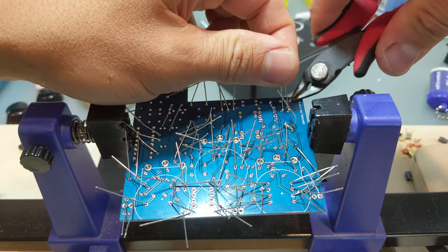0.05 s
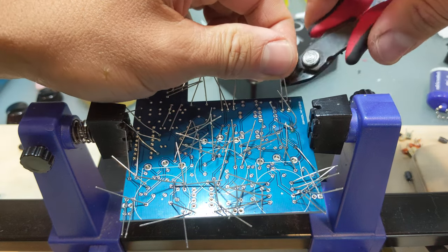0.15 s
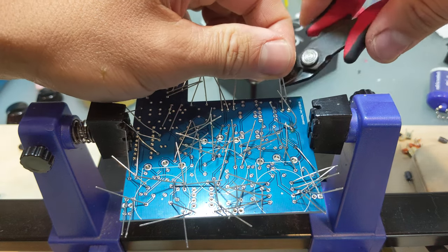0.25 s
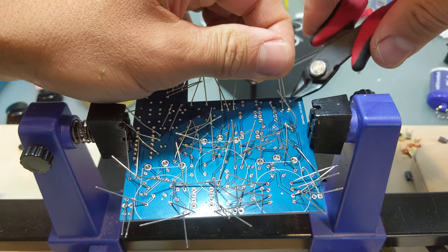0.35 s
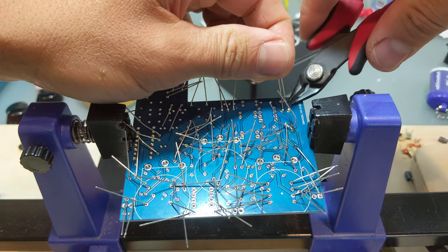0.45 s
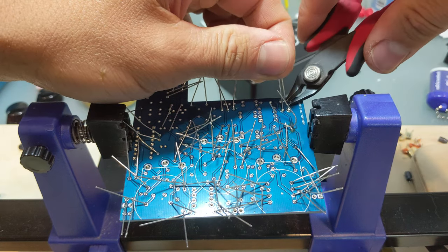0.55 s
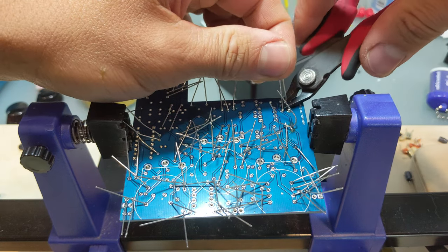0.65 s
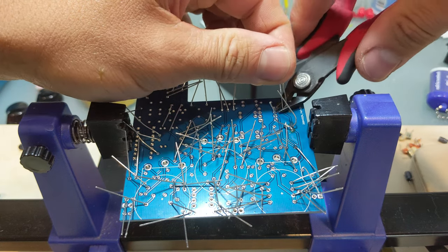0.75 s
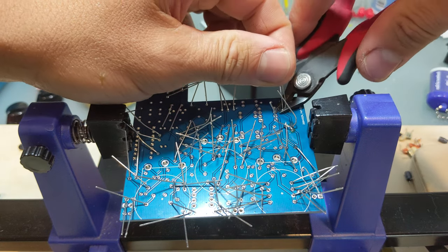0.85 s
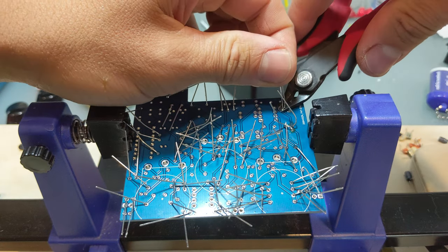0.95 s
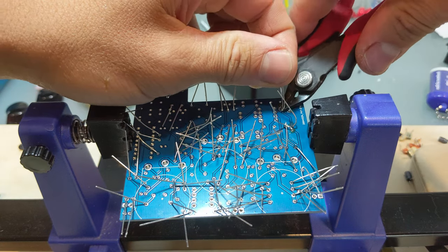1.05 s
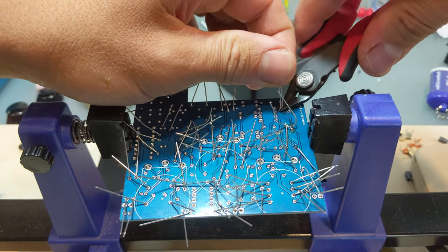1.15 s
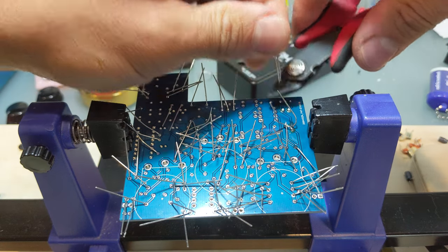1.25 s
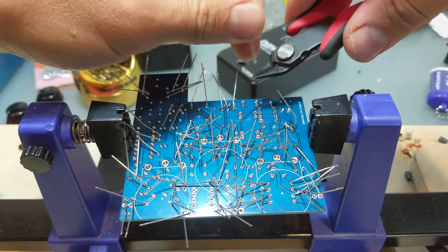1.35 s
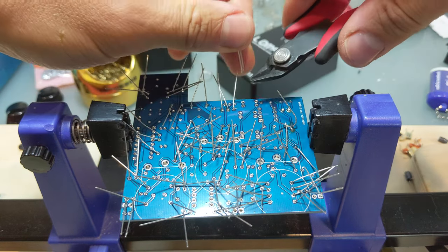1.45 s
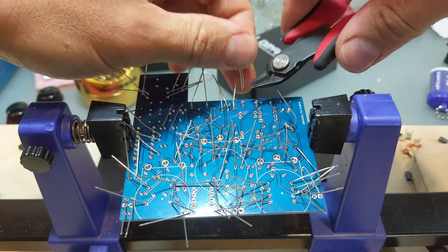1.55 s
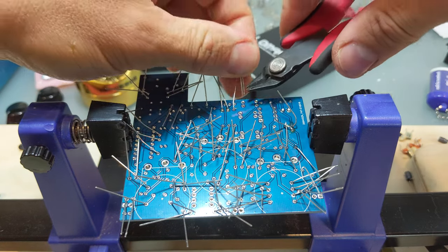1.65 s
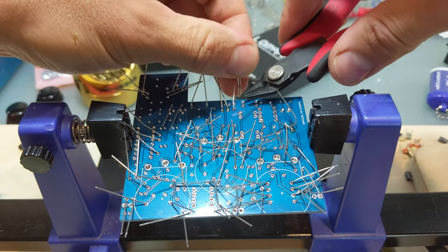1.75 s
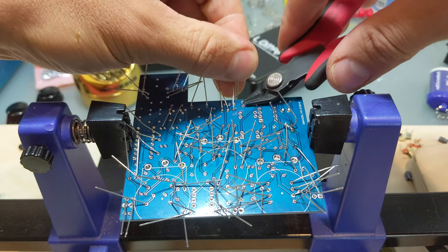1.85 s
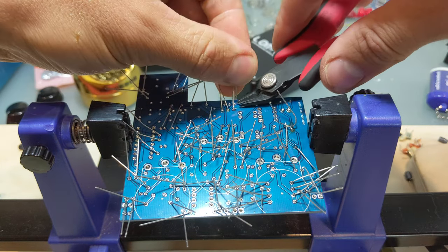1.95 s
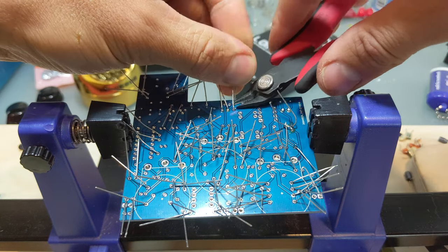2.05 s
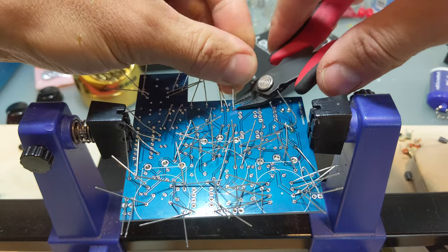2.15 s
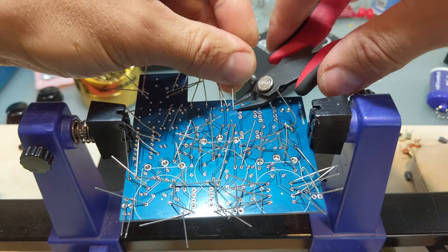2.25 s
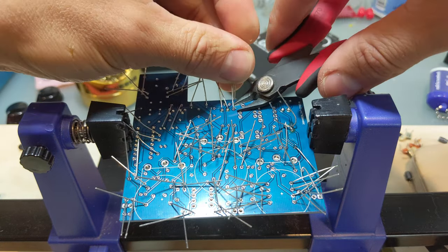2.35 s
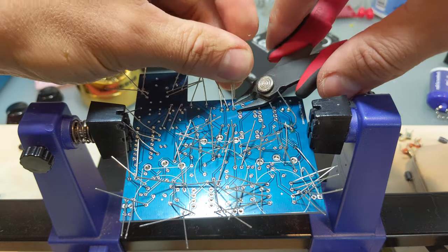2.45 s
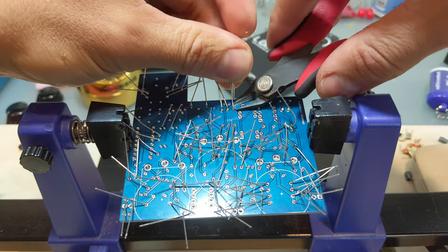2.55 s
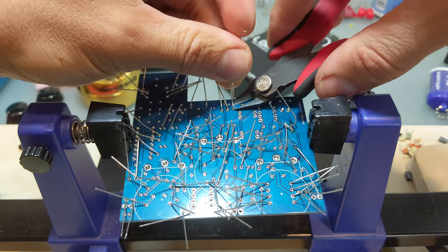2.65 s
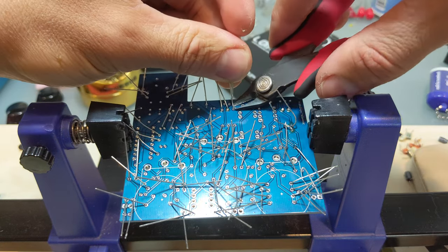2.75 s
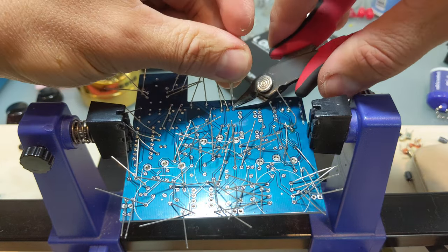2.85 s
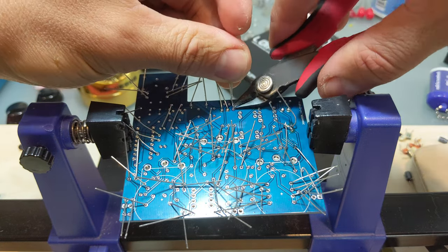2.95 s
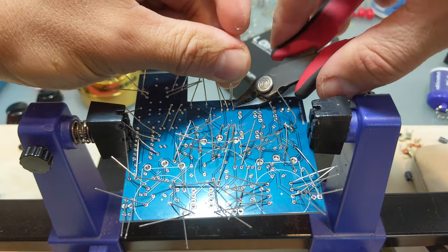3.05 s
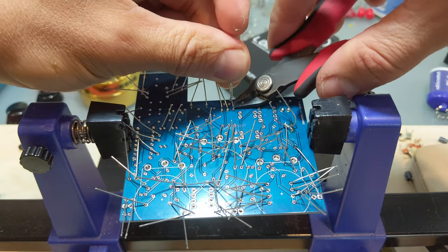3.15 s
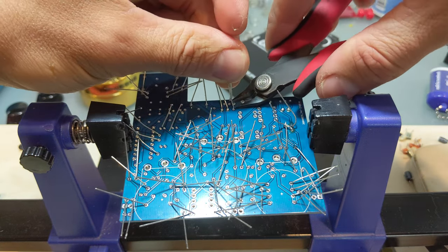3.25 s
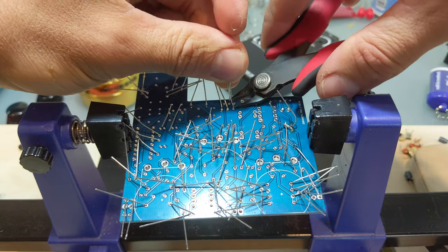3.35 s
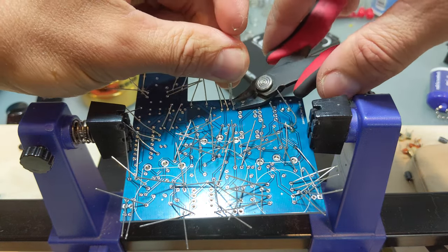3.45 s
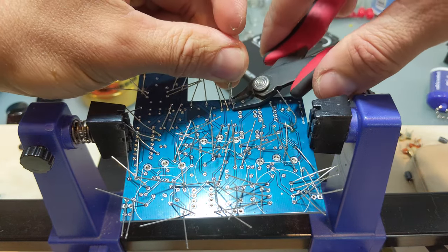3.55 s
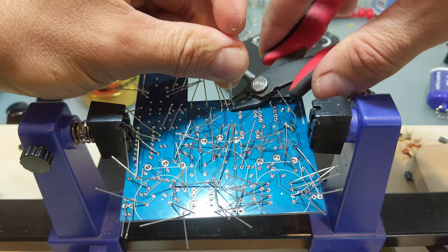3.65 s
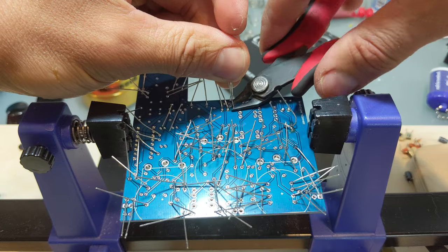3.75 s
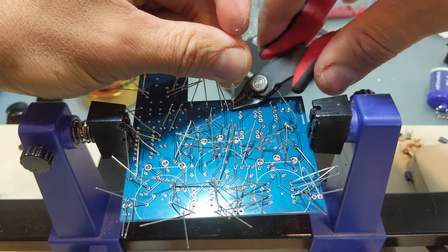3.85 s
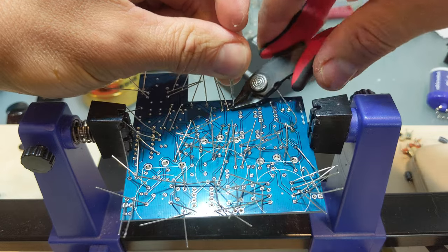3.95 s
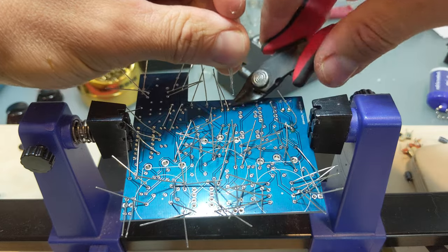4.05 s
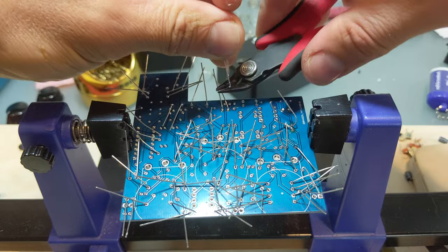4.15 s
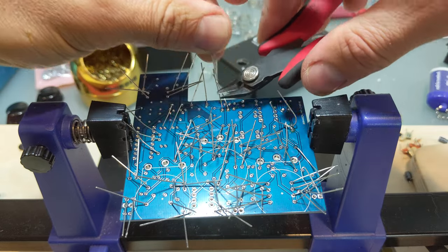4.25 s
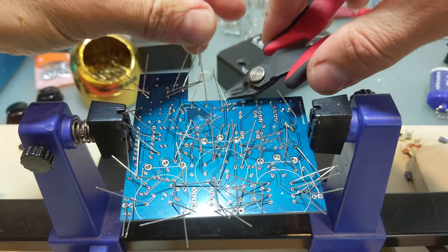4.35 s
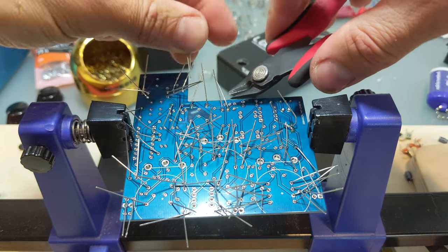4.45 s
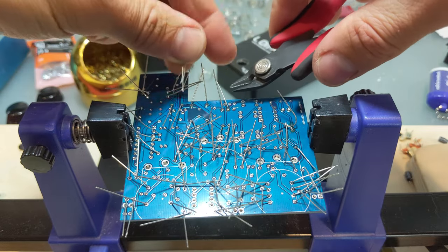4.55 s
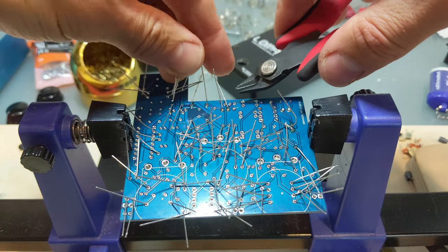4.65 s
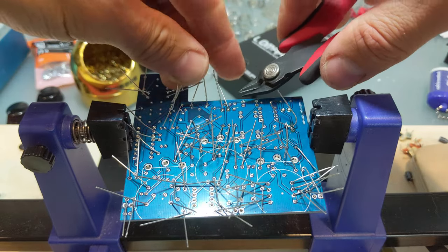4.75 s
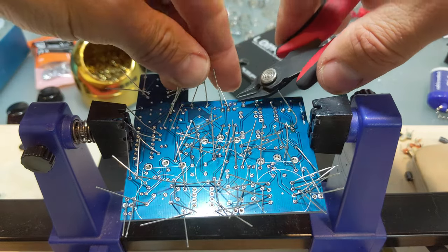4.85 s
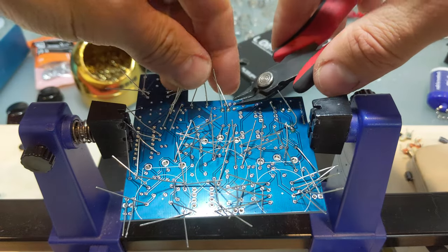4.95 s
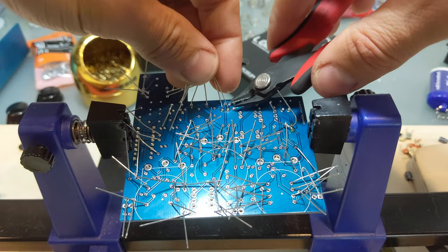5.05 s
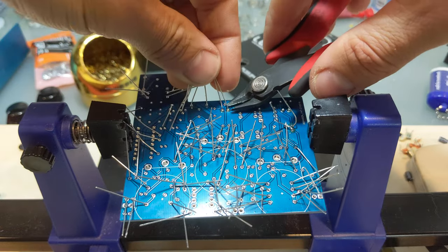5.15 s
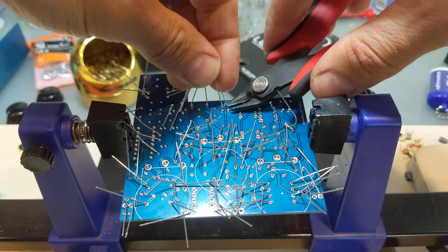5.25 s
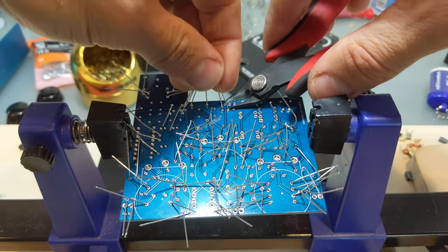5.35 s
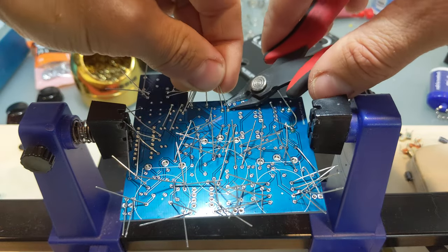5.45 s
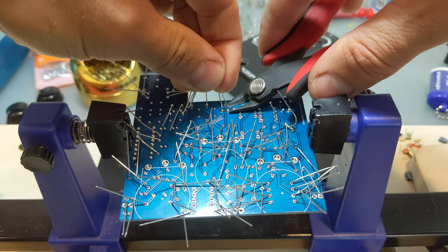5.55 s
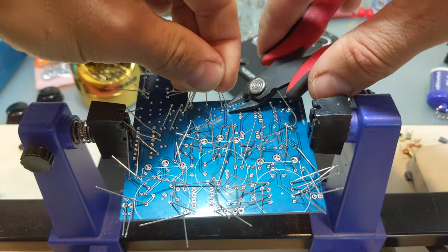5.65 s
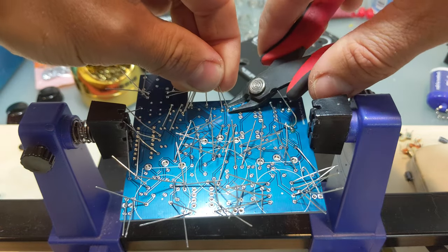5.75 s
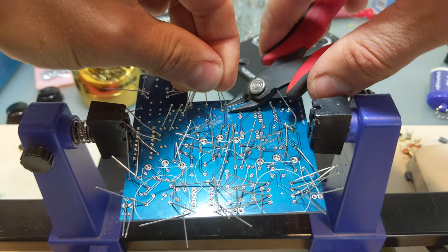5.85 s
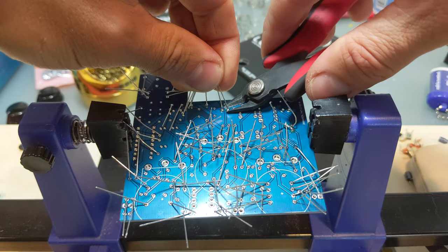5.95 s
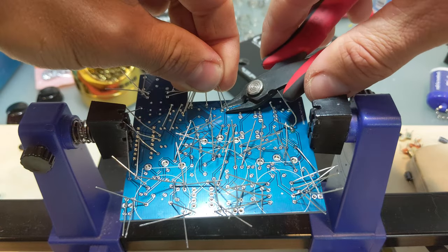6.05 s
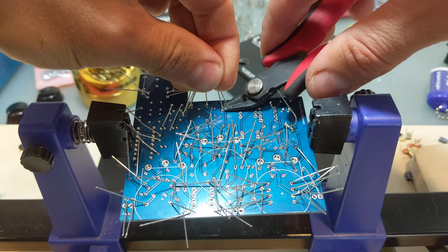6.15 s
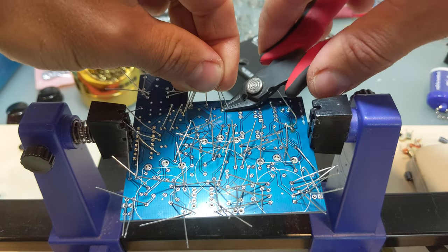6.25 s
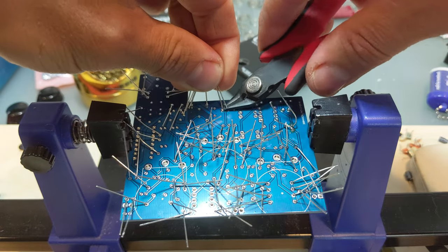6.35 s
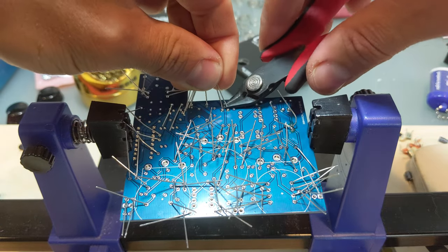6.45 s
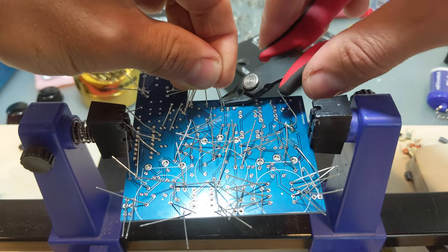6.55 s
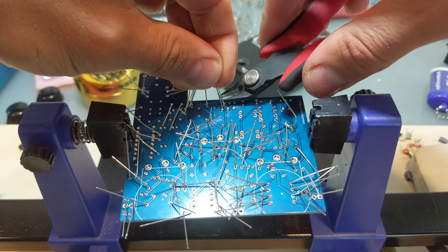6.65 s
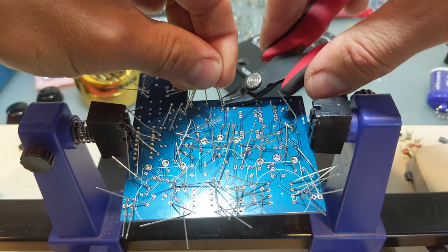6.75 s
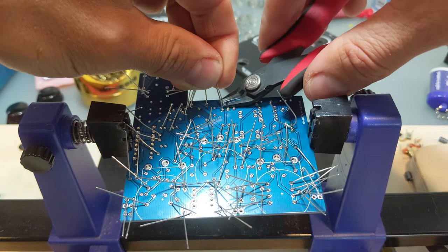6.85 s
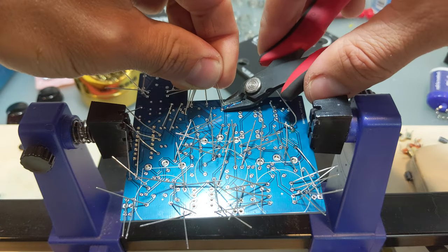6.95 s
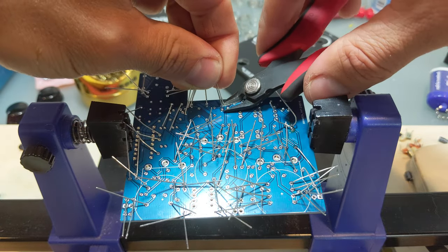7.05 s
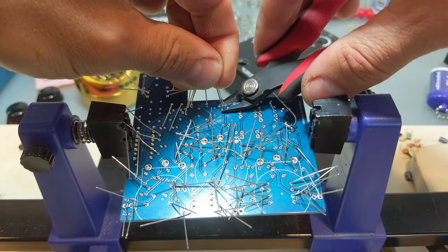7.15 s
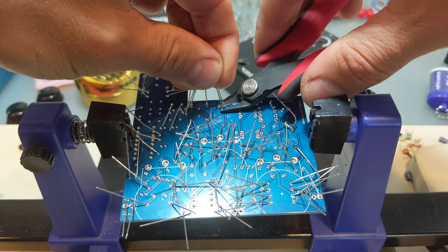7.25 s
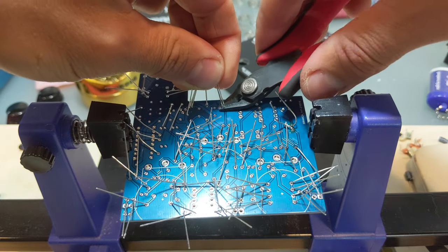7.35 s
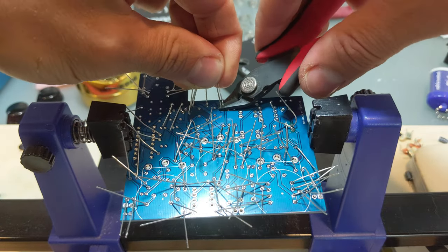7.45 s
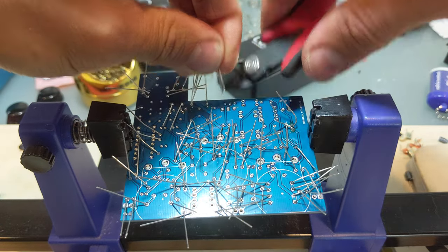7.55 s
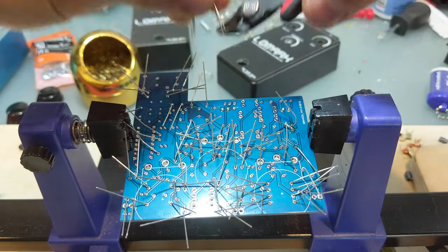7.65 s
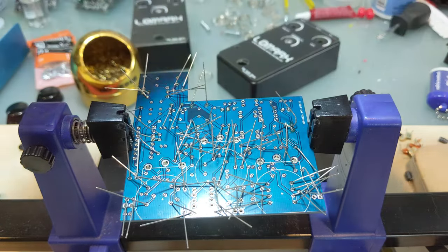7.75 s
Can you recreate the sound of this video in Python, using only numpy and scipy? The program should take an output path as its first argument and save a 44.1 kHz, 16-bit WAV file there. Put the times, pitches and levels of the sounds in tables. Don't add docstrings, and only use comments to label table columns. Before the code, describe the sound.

Close stereo sound of a workbench, the action stronger and brighter on the right. At 0.0 s the loudest snip cracks, a dry metallic snap with a short board ring, followed at once by jaw taps and a scrape; another tap comes at 0.5 s. A second snip falls at 1.2 s, then faint touches and wire ticks. At 4.0 s a third cut carries a solid woody knock from the holder. Around 5.0 to 5.1 s taut leads ping thinly amid light drags and ticks. A sharp, bright snip comes at 6.4 s, then small nudges around 6.6 s. Taps and scraping at 7.4 s lead into a duller, ringing cut at 7.5 s, and at 7.6 s a cut lead clinks brightly into a metal cup. Throughout, a low motor hum swells and wavers faintly beneath soft air noise, hiss and delicate wire rustling.

```python
import sys
import numpy as np
from scipy import signal
from scipy.fft import rfft, irfft
from scipy.io import wavfile

SR = 44100
rng = np.random.default_rng(int(sys.argv[2]) if len(sys.argv) > 2 else 0)


def store_pcm(level_fs):
    pcm = np.round(np.clip(level_fs, -1, 1) * 32767).astype(np.int16)
    wavfile.write(sys.argv[1], SR, np.atleast_2d(pcm).T)


def nominal_scale(level):
    x = np.asarray(level, float) / 20
    return 10 ** x


N = 343539
BITE_S = 0.003


def rms_one(x):
    return x / np.sqrt(np.mean(x ** 2) + 1e-20)


def at_hz(points, hz):
    point_hz, value = np.array(points).T
    return np.interp(np.log(hz), np.log(point_hz), value)


def in_time(rows):
    s, level_db = np.transpose(rows)
    return np.interp(np.arange(N) / SR, s, level_db)


def drift(rate):
    r = np.exp(-80 * np.pi * rate / SR)
    slow = signal.lfilter([1], [1, -2 * r, r * r], rng.standard_normal(N // 40 + 2002))[2000:]
    return np.interp(np.arange(N) / 40, np.arange(len(slow)), rms_one(slow))


def narrow(x, hz, width_hz):
    r = np.exp(-np.pi * width_hz / SR)
    top_gain = (1 - r * r) / 2
    return signal.lfilter(np.array([1, 0, -1]) * top_gain, [1, -2 * r * np.cos(2 * np.pi * hz / SR), r * r], x)


def air():
    # pitch_hz [Hz], level_db [dB per Hz]
    colour = [(15, -45), (25, -3), (66, -3.5), (186, -8), (237, -15.5), (286, -11.5), (404, -16.5),
              (488, -15.5), (1030, -20), (3010, -23.5), (3540, -24.5), (8100, -32), (12400, -35),
              (13800, -38), (15000, -16.5)]
    # pitch_hz [Hz], likeness [0 to 1]
    likeness = [(60, 0.77), (180, 0.84), (550, 0.24), (1650, 0.01), (4970, 0.063), (15000, 0.0123)]
    # pitch_hz [Hz], left_minus_right_db [dB]
    balance = [(60, -9), (180, -0.5), (550, -1.5), (1650, -2.0), (4970, -2.5), (15000, -1.5)]
    hz = np.maximum(np.fft.rfftfreq(N, 1 / SR), 10)
    mid, side = rfft(rng.standard_normal((2, N)))
    alike = np.clip(at_hz(likeness, hz), 0, 1)
    lean = nominal_scale(at_hz(balance, hz) / 2)
    pair = np.sqrt(1 + alike) * mid + np.sqrt(1 - alike) * side * [[1], [-1]]
    pair = np.array([lean, 1 / lean]) * pair
    return nominal_scale(-55.5) * rms_one(irfft(pair * nominal_scale(at_hz(colour, hz)), N))


def hum():
    # start_s [s], level_db [dB]
    swells = [(0.0, -57), (0.91, -52), (1.82, -66), (1.97, -51), (2.1, -75), (2.17, -56), (2.62, -66.5),
              (2.73, -53), (2.8, -60.5), (3.75, -49.5), (5.21, -57), (5.68, -69), (6.33, -53.5),
              (6.94, -56.5), (6.99, -68), (7.35, -55), (7.59, -70), (7.79, -60)]
    turn = 2 * np.pi * np.cumsum(59.1 + 0.3 * drift(2.08)) / SR
    base = np.sin(turn + 0.5 * drift(3.1)) * nominal_scale(in_time(swells) + 3.0 + 0.5 * drift(10.0))
    second = nominal_scale(-9.5) * np.sin(2 * turn) * nominal_scale(drift(3.5))
    fourth = np.sin(4 * turn)
    overtone = nominal_scale(-14.5) * np.sin(8.3 * turn) * nominal_scale(2.0 * drift(1.5))
    upper = (fourth + second + overtone) * nominal_scale(-61.5 + 2.55 * drift(8.6))
    return (base + upper) * nominal_scale([[-2.4], [2.1]])


def rustle():
    # start_s [s], level_db [dB]
    handling = [
        (0, -74.5),
        (1.9, -72),
        (4.55, -73.5),
        (4.7, -77),
        (6.0, -81),
        (6.9, -79),
        (7.79, -75),
    ]
    sizes = nominal_scale(3.6 * np.minimum(rng.exponential(1, N), 3.5)) * rng.choice([-1, 1], N)
    ticks_per_s = 250 * nominal_scale(4 * drift(8.0))
    stir = sizes * (rng.random(N) < ticks_per_s / SR)
    grain = rms_one(narrow(narrow(stir, 3700, 910), 2400, 1800)) * nominal_scale(-75.5)
    hiss = rms_one(narrow(narrow(rng.standard_normal(N), 13000, 1700), 12600, 2000))
    hiss = hiss * nominal_scale(in_time(handling) - 2.5)
    return grain * nominal_scale([[-9], [3]]) + hiss * nominal_scale([[-12], [4]])


def struck(hz, level_db, t60, size=2000):
    # pitch_hz [Hz], left_minus_right_db [dB]
    shadow = [(60, -5.0), (180, -6.0), (550, -5.5), (1650, -3.5), (4970, -6.5), (15000, -12.5)]
    hz, level_db, t60 = (np.asarray(v, float)[:, None] for v in (hz, level_db, t60))
    t = np.arange(size) / SR
    sign = (-1) ** np.arange(len(hz))[:, None]
    right = sign * nominal_scale(level_db - 60 * t / t60) * np.sin(2 * np.pi * hz * t)
    late = np.maximum(t - 0.000352, 0)
    treble_loss_db = 4.5 * np.clip(np.log2(hz / 5000), 0, 2)
    side_db = at_hz(shadow, hz) - 1.5 - treble_loss_db + 2.5 * rng.standard_normal(hz.shape)
    left = sign * nominal_scale(level_db + side_db - 60 * late / t60) * np.sin(2 * np.pi * hz * late)
    pair = np.array([left.sum(0), right.sum(0)])
    return pair / np.sqrt(np.sum(pair[1] ** 2))


def contact(length_ms, snap, size=6000):
    t = np.arange(size) / SR - BITE_S
    slips, *shiver = rng.standard_normal((3, size))
    fade = np.exp(-np.abs(t) / (max(length_ms, 0.2) / 1000))
    rattle = slips * np.where(t < 0, nominal_scale(-11 + 7700 * t), fade)
    rattle[round(BITE_S * SR)] += snap
    after = nominal_scale(-3.5 - 60 * t / 0.042) + nominal_scale(-26.5 - 60 * t / 0.12)
    return rattle[None], np.array(shiver) * after * np.clip(t / 0.00076, 0, 1)


def sounded(body, rattle, shiver, blur_s):
    blurred = body * np.exp(-np.arange(body.shape[1]) / SR / blur_s)
    return signal.fftconvolve(body, rattle, axes=1) + signal.fftconvolve(blurred, shiver, axes=1)


def wash(crack_db, size=6000):
    t = np.arange(size) / SR - BITE_S
    noise = rng.standard_normal((2, size))
    board = narrow(narrow(noise, 2400, 2140), 2400, 1350)
    board = board * nominal_scale(-1.5 - 60 * t / 0.11) * nominal_scale([[-5.5], [0]])
    leads = narrow(noise, 5300, 8000)
    leads = leads * nominal_scale(-43 + 0.21 * crack_db - 60 * t / 0.073) * nominal_scale([[-9], [0]])
    return (board + leads) * np.clip(t / 0.003, 0, 1)


def blow(ring_db, knock_db, crack_db, hz, length_ms, blade_db, thump_db, snap):
    # pitch_ratio [1], level_db [dB], t60_s [s]
    board = [(0.7, -34, 0.008), (0.818, 2.5, 0.017), (0.942, -2.5, 0.0044), (1.028, -16, 0.093),
             (1.02, 13, 0.017), (1.15, 3.5, 0.035), (1.3, 8, 0.0055)]
    # pitch_hz [Hz], level_db [dB], t60_s [s]
    holder = [(649.6, -9.5, 0.06), (845, -31.5, 0.011), (1055, 1.5, 0.031), (1047, 13, 0.017),
              (1380, -14, 0.011), (1573, 4.5, 0.021)]
    # pitch_hz [Hz], level_db [dB], t60_s [s]
    blades = [(3670, 16, 0.0012), (4750, 0, 0.006), (4130, 2, 0.011)]
    # pitch_hz [Hz], level_db [dB]
    jaws = [(2710, -36), (4600, -3.5), (6400, -4.5), (6800, 6.5), (9120, 1), (10800, -1), (12600, 4.5),
            (14000, 5)]
    # pitch_hz [Hz], level_db [dB], t60_s [s]
    bench = [(107.4, 1.5, .12), (176, 0.5, 0.032), (208, -0.5, 0.075), (323, 4.5, 0.04), (407.4, 1, 0.069),
             (543, -4.5, 0.05)]
    ratio, board_db, board_t60 = np.transpose(board)
    jaw_hz = np.geomspace(4900, 16000, 18) * np.exp(0.013 * rng.standard_normal(18))
    body = struck(hz * ratio, board_db, board_t60)
    body = body + nominal_scale(knock_db + 10.5) * struck(*np.transpose(holder))
    body = body + nominal_scale(blade_db) * struck(*np.transpose(blades))
    body = body + nominal_scale(crack_db + 7) * struck(jaw_hz, at_hz(jaws, jaw_hz), np.full(18, 0.0035))
    rattle, shiver = contact(length_ms, snap)
    push = (rattle + shiver[1])[:, :2000]
    thump = signal.fftconvolve(struck(*np.transpose(bench), size=6000), push, axes=1)
    sound = sounded(body, rattle, shiver, blur_s=0.00094) + nominal_scale(thump_db) * thump
    sound[:, :6000] += wash(crack_db)
    return nominal_scale(ring_db + 1.0) * sound


def place(track, s, sound):
    i = max(round((s - BITE_S) * SR), 0)
    track[:, i:i + sound.shape[1]] += sound[:, :N - i]


def snips(track):
    # start_s [s], ring_db [dB], knock_db [dB re ring], crack_db [dB re ring], pitch_hz [Hz]
    cuts = [
        (0.0094, -10.5, -91, -12.5, 2720),
        (1.1795, -14, -44, -13.5, 2580),
        (3.9992, -14.5, -13.5, -8.5, 2810),
        (6.3983, -16, -14.5, -1, 2770),
        (7.4867, -13.5, -28.5, -27.5, 2495),
    ]
    for s, ring_db, knock_db, crack_db, hz in cuts:
        blade_db, thump_db = 3.5 + 0.48 * knock_db, -11.5 + 0.13 * knock_db
        place(track, s, blow(ring_db - 1.0, knock_db, crack_db, hz, 0.69, blade_db, thump_db, snap=3.9))


def light_blow(ring_db, knock_db, crack_db, hz, length_ms):
    return blow(ring_db - 4.0, knock_db, crack_db, hz, length_ms, -12.0, knock_db + 2.0, snap=2.8)


def touches(track):
    # start_s [s], ring_db [dB], knock_db [dB re ring], crack_db [dB re ring], pitch_hz [Hz]
    set_downs = [(0.062, -22.5, -14.5, -16, 2890), (0.0827, -27.5, -47, -17, 2250),
                 (0.4644, -28, -51, -21, 2860), (0.8621, -36, -11.5, -17, 2460),
                 (1.7163, -40, -31, -16, 1960), (1.9438, -36.5, -7.5, -18, 2740),
                 (2.151, -45.5, -1.5, -6.5, 2900), (2.688, -37.5, -8.5, -21, 2390),
                 (2.7904, -42, -10.5, -4, 4140), (3.051, -40.5, -17, -12, 2310),
                 (3.0789, -32.5, -18, -11.5, 4320), (3.458, -39.5, -11, -3, 2800),
                 (3.8098, -33.5, -5.5, -18, 2770), (5.31, -38, -14, -7, 2770),
                 (5.375, -43.5, -8, -13, 2750), (5.5721, -42.5, -3.5, -17, 2950),
                 (6.0751, -47, -1.5, -12, 2710), (6.2218, -38.5, -5, -9, 2650),
                 (6.571, -36.5, -12, -19, 2400), (6.8429, -43, -2.5, -18.5, 2790),
                 (6.961, -46, -5.5, -18, 2230), (7.3888, -28.5, -9.5, -12, 2700),
                 (7.4911, -35, -33, 3.5, 2320), (7.5791, -39.5, -3, -11, 2910)]
    for s, ring_db, knock_db, crack_db, hz in set_downs:
        place(track, s, light_blow(ring_db, knock_db, crack_db, hz, length_ms=1.71))


def drags(track):
    # start_s [s], ring_db [dB], pitch_hz [Hz], length_ms [ms]
    scrapes = [(0.0704, -30, 2400, 9.6), (0.4727, -45, 3100, 11), (0.8695, -40.5, 2540, 4.8),
               (1.286, -44.5, 2710, 24), (1.7, -51.5, 2350, 22), (3.459, -52, 2470, 20),
               (3.8131, -32, 2380, 11), (5.0652, -43.5, 3870, 13), (5.1927, -43.5, 2790, 11),
               (5.3828, -51, 2840, 19), (5.5737, -44, 2920, 23), (6.23, -42, 3050, 3.4),
               (6.6219, -44, 2370, 10), (6.844, -41, 2700, 8.7), (7.3956, -32, 2620, 13.7),
               (7.583, -40.5, 2900, 16)]
    for s, ring_db, hz, length_ms in scrapes:
        place(track, s, blow(ring_db - 12.0, -18, -7, hz, length_ms, blade_db=1.0, thump_db=-3.5, snap=0))


def ticks(track):
    # start_s [s], ring_db [dB], pitch_hz [Hz]
    lead_ticks = [(0.199, -56, 2430), (1.297, -47.5, 2840), (3.224, -59, 3530), (3.8206, -38, 2340),
                  (4.3508, -55.5, 2600), (5.12, -55, 3500), (5.2445, -53, 3380), (5.2974, -53, 3560),
                  (5.493, -54.5, 3940), (5.591, -50, 2970), (5.6934, -56, 3540), (6.2338, -43, 2890),
                  (7.2358, -69, 3000)]
    for s, ring_db, hz in lead_ticks:
        place(track, s, light_blow(ring_db, knock_db=-27, crack_db=-6, hz=hz, length_ms=2.8))


def nudges(track):
    # start_s [s], ring_db [dB], knock_db [dB re ring]
    pushes = [(0.735, -49.5, -5), (1.24, -57, 3.5), (1.958, -46, -13), (3.4774, -51, -0.5),
              (3.771, -46, -8), (3.788, -42, -42), (5.1935, -46.5, 2), (6.5225, -48.5, -4.5),
              (6.563, -54, 6), (6.586, -39.5, -9.5), (6.6024, -44, -0.5), (6.621, -45.5, -2.5),
              (7.0192, -49, -10), (7.1152, -56, 1), (7.3534, -48, -6.5), (7.3845, -46, -7)]
    for s, ring_db, knock_db in pushes:
        place(track, s, light_blow(ring_db, knock_db, crack_db=-14.5, hz=2560, length_ms=1.37))


def pings(track):
    # start_s [s], level_db [dB], t60_s [s]
    plucks = [
        (5.001, -56, .1),
        (5.01, -51, 0.14),
        (5.0599, -44.5, .05),
        (5.078, -53, .2),
        (5.1386, -44, 0.027),
    ]
    for s, ping_db, ring_s in plucks:
        lead = struck(3570 * np.array([1, 1.14]), [0, 3.0], [ring_s, 0.018], size=6000)
        rattle, _ = contact(length_ms=1.3, snap=3.6)
        place(track, s, nominal_scale(ping_db) * signal.fftconvolve(lead, rattle, axes=1))


def clink(track):
    # pitch_hz [Hz], level_db [dB], t60_s [s]
    cup = [(566, -24.5, 0.22), (640, -25, .17), (3545, -9, .12), (3630, -1.5, .035), (3930, 2.5, .04),
           (4060, -2.5, .025), (4130, -3, 0.035), (7960, -12, 0.01), (9900, -14, .08), (10150, -6, .015),
           (10500, -13, 0.032)]
    sound = sounded(struck(*np.transpose(cup), size=6000), *contact(length_ms=1.1, snap=2.8), blur_s=0.0011)
    sound[:, :6000] += nominal_scale(-9.5) * wash(crack_db=0)
    t = np.arange(6000) / SR - BITE_S
    sizzle = narrow(rng.standard_normal((2, len(t))), 12500, 9000)
    sizzle = sizzle * nominal_scale(-20.5 - 60 * t / 0.15) * np.clip(t / 0.001, 0, 1)
    sound[:, :6000] += sizzle * nominal_scale([[-8], [0]])
    place(track, 7.636, nominal_scale(-18.5) * sound)


def work():
    track = np.zeros((2, N))
    for source in (snips, touches, drags, ticks, nudges, pings, clink):
        source(track)
    return track


def reflections(x):
    # pitch_hz [Hz], t60_s [s]
    walls = [(300, 0.72), (1400, 0.11), (3000, 0.26), (6000, 0.23), (12000, 0.33)]
    t, tail = np.arange(SR // 3) / SR, 0
    edges = np.geomspace(100, 16000, 9)
    for low, high in zip(edges, edges[1:]):
        band_pass = signal.butter(2, [low, high], "band", fs=SR, output="sos")
        band = signal.sosfilt(band_pass, rng.standard_normal((2, len(t))))
        tail = tail + band * nominal_scale(-60 * t / at_hz(walls, np.sqrt(low * high)))
    tail = tail * np.clip(t / 0.002, 0, 1)
    return signal.fftconvolve(x, tail / np.sqrt(np.sum(tail ** 2) / 2), axes=1)[:, :N]


def scene():
    background = air() + hum() + rustle()
    near = work()
    return near + nominal_scale(-19) * reflections(near) + background


def top_cut(x):
    return signal.sosfilt(signal.butter(12, 16510, fs=SR, output="sos"), x)


def record(dry):
    cutoff_hz = 14180
    dry = signal.sosfilt(signal.butter(4, 42, "high", fs=SR, output="sos"), dry)
    dry = 0.8 * np.tanh(dry / 0.8)
    cut = signal.sosfilt(signal.ellip(12, 0.5, 70, cutoff_hz, fs=SR, output="sos"), dry)
    top_pass = signal.butter(6, cutoff_hz, "high", fs=SR, output="sos")
    leak = nominal_scale(-27) * signal.sosfilt(top_pass, dry * np.abs(dry) ** 0.5)
    return top_cut(cut + leak)


dry = scene()
out = record(dry)
store_pcm(out)
```